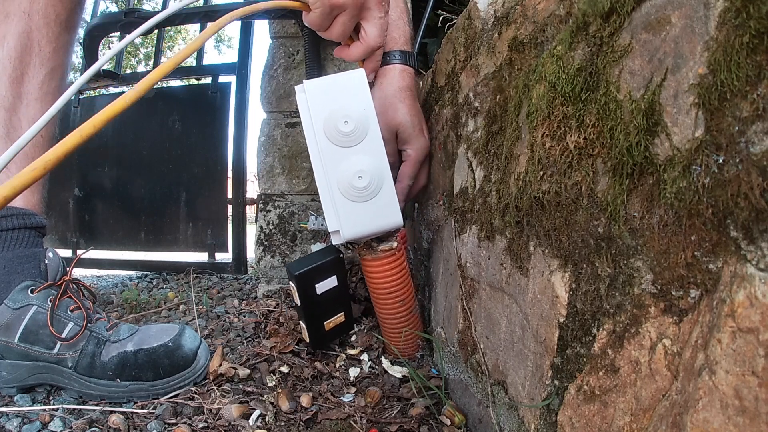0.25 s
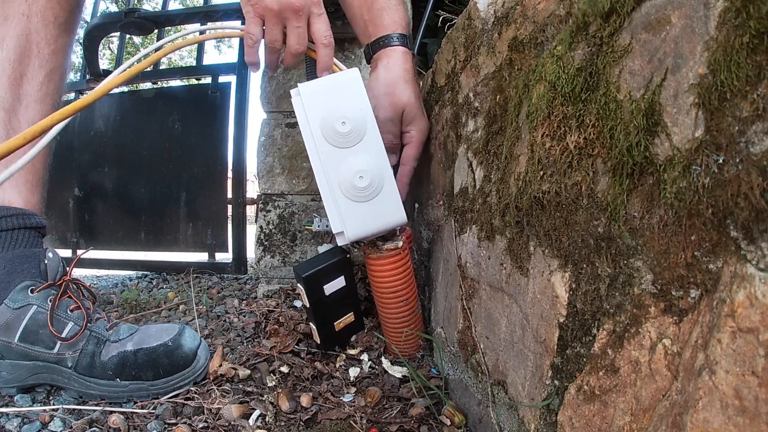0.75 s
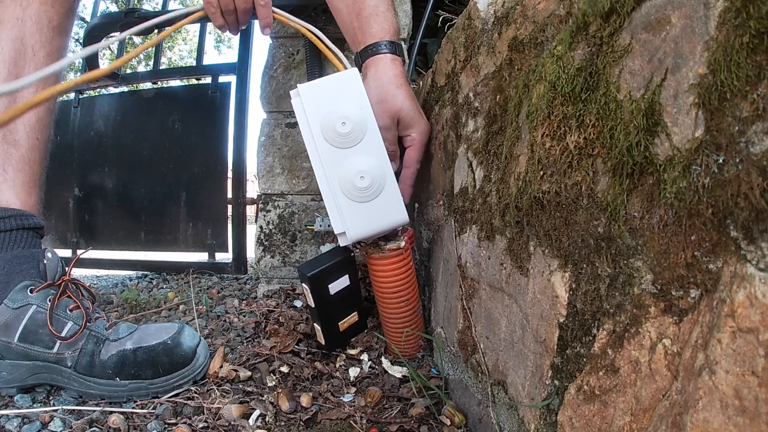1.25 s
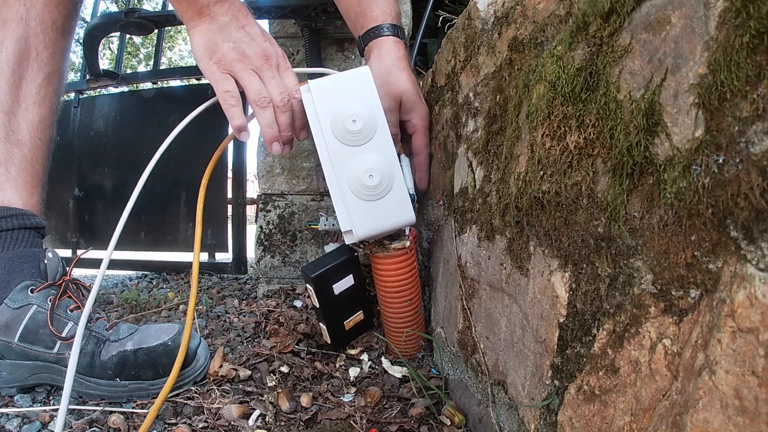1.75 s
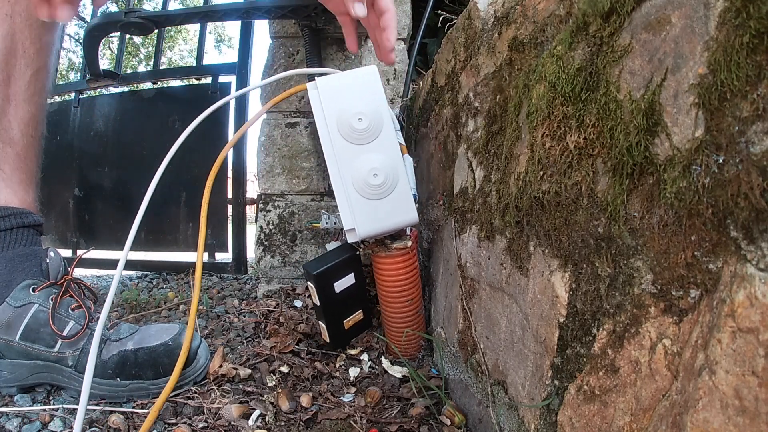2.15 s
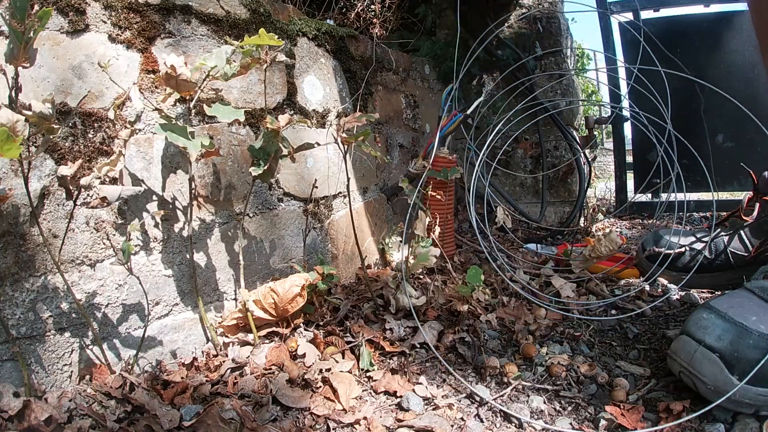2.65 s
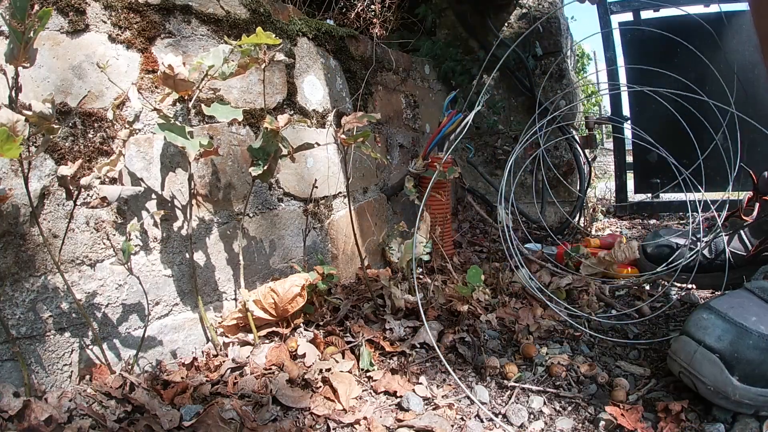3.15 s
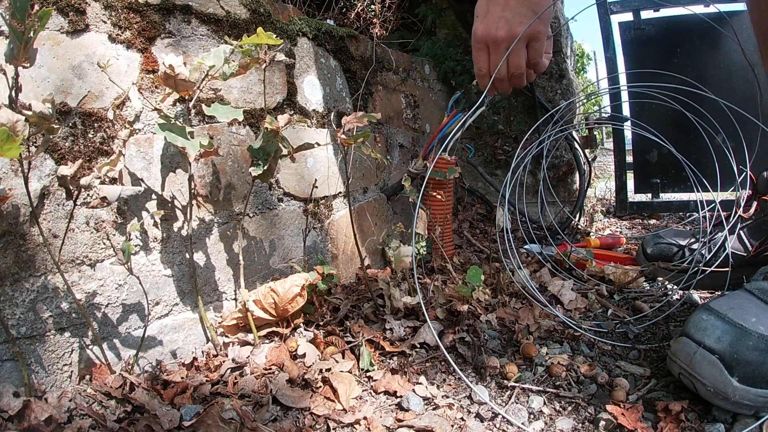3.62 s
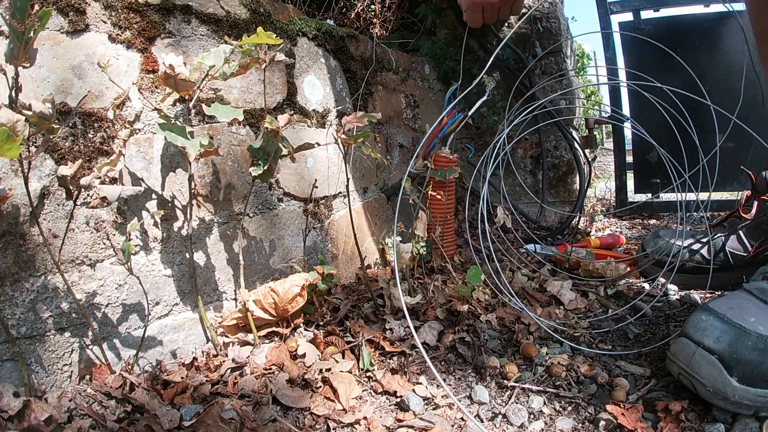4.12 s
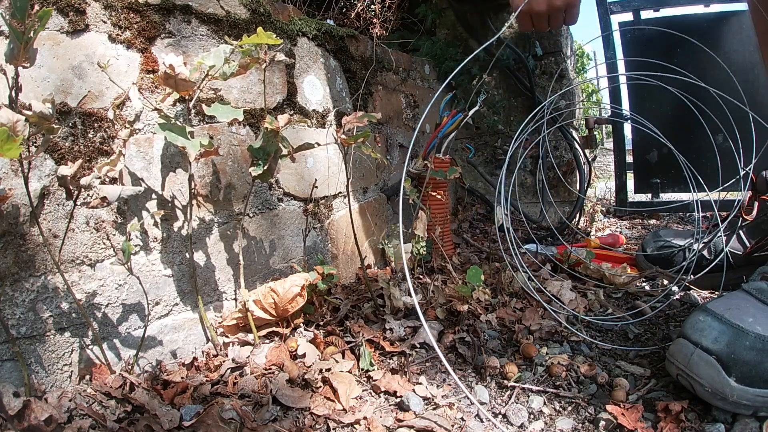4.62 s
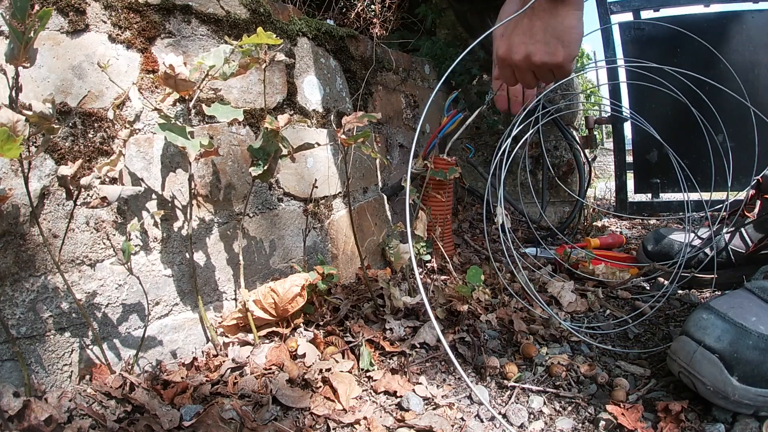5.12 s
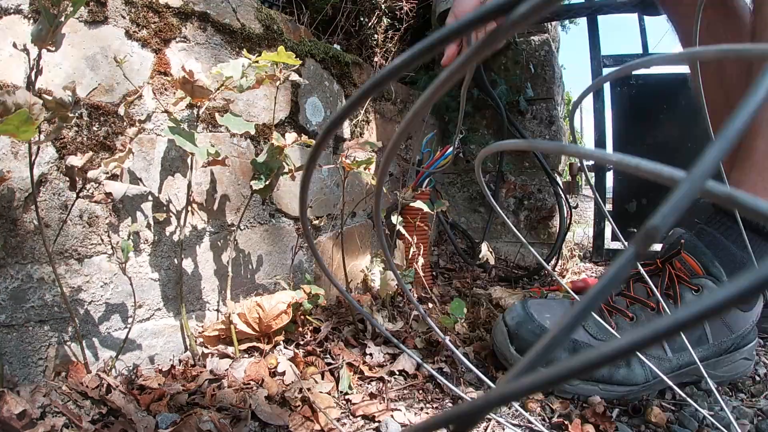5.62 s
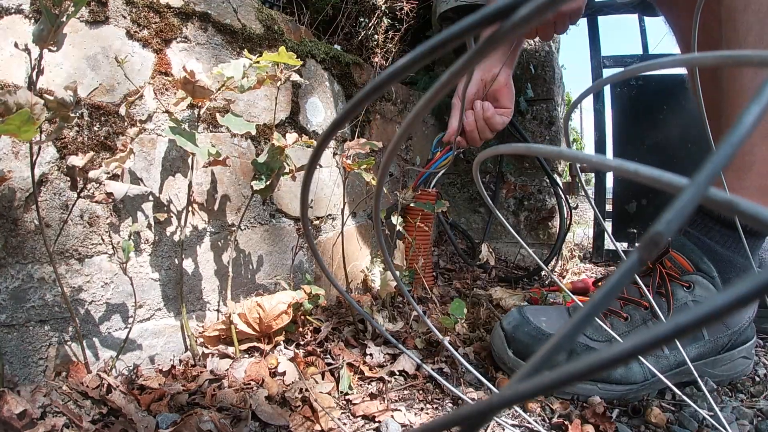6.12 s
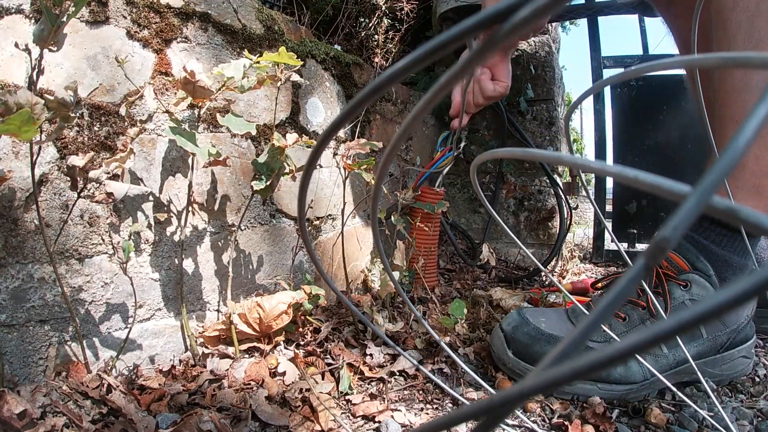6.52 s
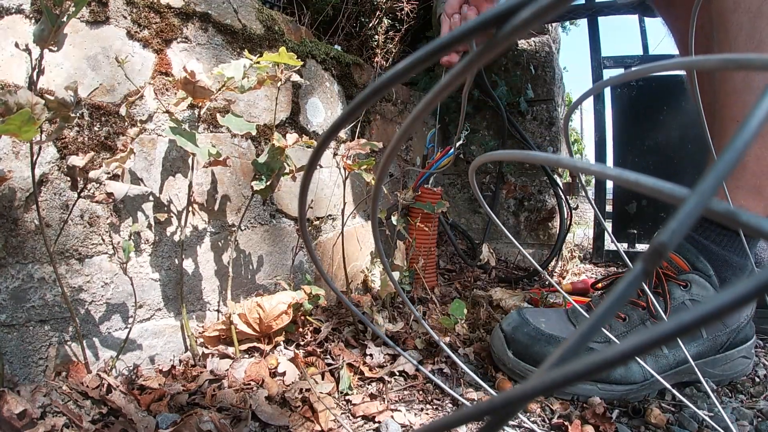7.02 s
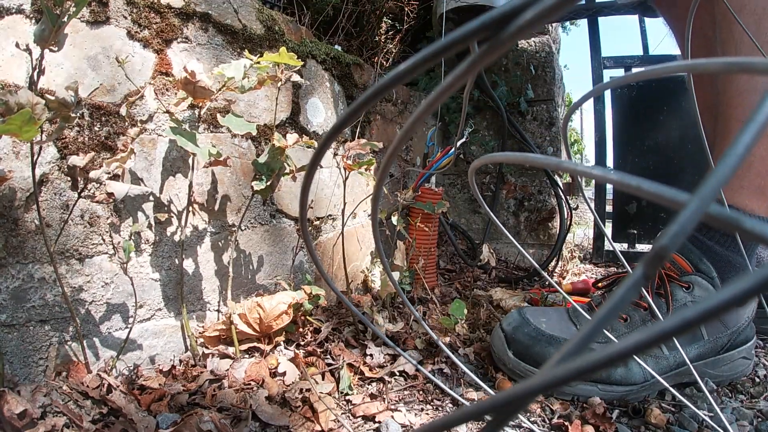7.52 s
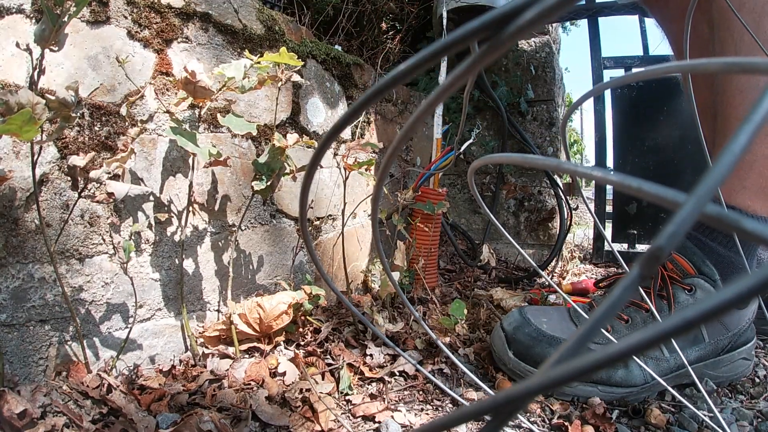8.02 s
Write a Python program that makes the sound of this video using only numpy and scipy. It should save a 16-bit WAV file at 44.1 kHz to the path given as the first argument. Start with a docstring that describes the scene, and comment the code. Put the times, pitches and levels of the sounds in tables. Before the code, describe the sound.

Close outdoor handling of cables and plastic conduit. Quiet rubbing and small dull knocks come first, building to a cluster of hollow thumps. Then thin wire is drawn in long bright hissing strokes with dry ticks and tiny squeaks. Finally stiff coils clack, scrape and drum right by the microphone, fading into low hollow rubbing over faint open air.

```python
"""One hears knocks and hollow rubbing, then long hissing strokes, then clacks, scrapes and drumming.
Cables are worked through corrugated plastic conduit at the foot of a stone wall: slid by hand over a junction
box, then a thin wire drawn out, then coils of cable dragged close by the microphone.
Rubbing is trains of tiny random slips over hiss; contacts are short trains of blows through a coloured filter;
knocks are sagging sines. Outdoor air, a deep rumble, a faint hum and sparse echoes lie behind."""
import sys
import numpy as np
from scipy import signal
from scipy.fft import rfft, irfft
from scipy.io import wavfile
from scipy.ndimage import uniform_filter1d

SR = 44100
rng = np.random.default_rng(int(sys.argv[2]) if len(sys.argv) > 2 else 0)


def unload_audio(sound):
    """Save the sound as a 16-bit wav file, at the path given as the first command line argument."""
    columns = np.transpose(np.atleast_2d(sound))
    # keep every value between -1 and 1, then stretch to whole-number steps
    steps = np.round(np.clip(columns, -1, 1) * 32767)
    wavfile.write(sys.argv[1], SR, steps.astype(np.int16))


N = 364266
T = np.arange(N) / SR
HZ = np.fft.rfftfreq(4096, 1 / SR)

# Levels in the tables are relative: a source may trim them further where it is mixed.
# pulls of cable over the box, draws of the wire, drags of the coils:
# (time at full speed [s], scrape level [dB], hollow rub level [dB], rise [s], fall [s])
BOX_PULLS = [(0.02, -54, -38, 0.018, 0.09), (0.41, -56, -44, 0.049, 0.032),
             (0.61, -47.5, -41, 0.067, 0.072), (0.8, -56, -45, 0.086, 0.14), (1.25, -43.5, -47.5, .2, 0.15),
             (1.55, -46, -52.5, 0.093, 0.09), (1.77, -50.5, -57, 0.2, .04), (2.0, -69, -45, 0.13, 0.18),
             (2.21, -32.5, -30, .1, 0.12), (2.33, -37, -30, .03, 0.018), (2.46, -43, -42, 0.023, .02)]
WIRE_DRAWS = [(2.53, -30, -36, 0.076, 0.31), (2.9, -36, -34, .04, 0.064), (3.05, -39.5, -66, 0.11, 0.11),
              (3.218, -28, -37, 0.1, .17), (3.6, -39, -49, 0.087, 0.15), (4.0, -42, -39, 0.078, 0.052),
              (4.18, -37, -40, 0.2, 0.18), (4.47, -43.5, -69, 0.18, 0.11),
              (4.67, -34.5, -42.5, 0.086, 0.11), (4.939, -36, -48, 0.12, 0.19),
              (5.58, -52, -46.5, 0.065, .15)]
COIL_DRAGS = [(5.87, -41.5, -39, .04, 0.071), (6.11, -33.5, -34, 0.13, 0.031),
              (6.39, -36, -38.5, 0.18, 0.079), (6.58, -31.5, -29.5, 0.051, 0.055),
              (6.92, -38.5, -37, 0.11, 0.23), (7.05, -42, -26.5, 0.064, 0.075),
              (7.32, -36.5, -20, 0.07, 0.078), (7.46, -28.5, -24, 0.15, 0.19), (7.75, -44, -27, 0.17, 0.14),
              (8.19, -63, -30, 0.066, 0.043)]
# colours of the scrape and of the hollow rub in each stage: (frequency [Hz], level per Hz [dB])
BOX_SCRAPE_COLOUR = [(650, -43), (1100, -0.5), (1470, -6.5), (1660, -24), (2550, 2), (3010, -1.5),
                     (3520, 1), (4340, -6.5), (6250, 3), (6990, -3.5), (8620, -3.5), (11500, -22.5),
                     (13000, -22), (15500, -33)]
BOX_RUB_COLOUR = [(30, -37), (70, -1.5), (110, -2.5), (170, 6.5), (320, 3), (450, -4), (680, 0.5),
                  (1050, -12), (1400, -12), (1900, -17.5), (3000, -74)]
WIRE_SCRAPE_COLOUR = [(530, -20.5), (900, -11), (1170, -12), (1750, -2), (2660, -7.5), (3260, -1),
                      (4390, -4), (5980, 1), (6900, -4.5), (7680, -8.5), (8340, -11.5), (9400, -6),
                      (11400, -21.5), (13100, -19), (15500, -38)]
WIRE_RUB_COLOUR = [(29, -36), (50, -14), (76, -6), (108, -12), (194, 5), (274, -6), (420, -5), (499, -9),
                   (562, -5.5), (1200, -20.5), (1560, -13), (2640, -120)]
COIL_SCRAPE_COLOUR = [(500, -27.5), (780, -0.5), (950, -18), (1160, -1.5), (1350, -8.5), (1600, 3.5),
                      (2050, -6), (2800, -2.5), (3760, -9.5), (4600, -4), (7000, -31.5), (10000, -39.5),
                      (12400, -30), (15500, -52)]
COIL_RUB_COLOUR = [(25, -39), (45, -20), (80, -4.5), (110, -13), (160, -0.5), (230, 1), (350, -8),
                   (450, -7), (650, -15), (790, -15.5), (950, -29), (1400, -26), (2200, -62)]
# resonances of box, wire and coils: (frequency [Hz], width at half amplitude [Hz], level [dB])
BOX_RESONANCES = [(2600, 170, -27.5), (5800, 200, -7), (6430, 87, 13.5), (9100, 75, -2)]
WIRE_RESONANCES = [(1680, 110, -14), (3520, 610, -1), (6140, 190, 4), (7750, 330, 5.5), (8500, 230, -12)]
COIL_RESONANCES = [(1152, 78, -2.5), (1600, 55, 6.5), (2247, 66, 7), (2750, 81, 5.5), (3070, 67, -16),
                   (3450, 32, 4), (4000, 43, -16), (4294, 69, 5), (4510, 110, 2.5), (5660, 160, -6.5),
                   (6410, 110, -13), (7840, 47, -38), (8590, 31, -18)]
# colours of the sharp contacts: (frequency [Hz], level per Hz [dB])
TICK_COLOUR = [(350, -14), (600, -5.5), (1020, -7.5), (1810, -6.5), (3820, 2), (4490, -7.5), (6150, 1.5),
               (8400, -3.5), (9120, -8), (11300, -22), (13000, -25), (15500, -33)]
CLACK_COLOUR = [(290, -46), (500, -12), (954, -12.5), (1120, -20), (1560, 6), (2070, -4), (2260, 0),
                (2720, 3.5), (3790, -10.5), (4380, 3), (7030, -24), (8000, -20.5), (9790, -32.5),
                (12100, -23), (15500, -50)]
# clacks of the coiled wire: (time [s], level [dB], rise [s], brightness [dB per octave])
CLACK_EVENTS = [(5.655, -9, 0.0065, -2.5), (5.735, -25.5, .002, -3.5), (5.937, -23.5, .0012, -8),
                (5.946, -18, .003, -2), (6.0637, -3.5, 0.004, 0.5), (6.088, -17.5, .0025, -2.5),
                (6.171, -22, 0.0026, 2), (6.238, -23, 0.0071, -2), (6.268, -6, 0.0029, -0.5),
                (6.337, -12, .003, -0.5), (6.402, -26.5, .001, 1), (6.619, -29.5, 0.00065, 8),
                (6.763, -16, 0.0079, 2.5), (6.785, -17, 0.011, 0.5), (6.853, -21.5, 0.0066, 0),
                (7.113, -25, 0.0062, -4), (7.387, -14.5, 0.014, -0.5), (7.445, -18, 0.0025, 4),
                (7.467, -19, .002, 2), (7.585, -9, 0.0069, 3.5), (7.778, -25.5, 0.0013, 4)]
# dull knocks on box and conduit: (time [s], peak level [dB], nominal pitch [Hz])
KNOCK_EVENTS = [(.007, -19, 784), (.333, -39, 780), (.376, -32, 650), (.425, -28, 490), (.617, -25, 570),
                (.789, -36.5, 805), (.805, -26.5, 670), (0.827, -43, 690), (1.451, -40.5, 600),
                (1.654, -45, 302), (2.051, -37, 482), (2.09, -25.5, 308), (2.106, -26.5, 327),
                (2.15, -15, 560), (2.232, -11, 343), (2.303, -23, 470), (2.327, -12, 477),
                (2.3595, -7.5, 425), (2.411, -17, 800), (2.418, -15, 470), (2.472, -24, 290),
                (2.586, -17.5, 600), (2.602, -23.5, 514), (3.888, -43.5, 230), (4.191, -29.5, 193),
                (4.704, -34, 396), (4.323, -32.5, 880), (5.335, -40.5, 656), (5.766, -27.5, 205.7),
                (6.542, -31, 540), (6.585, -6, 400), (6.848, -19, 242), (7.405, -18.5, 270),
                (7.465, -21, 338), (7.735, -22, 176), (8.18, -26, 390)]
# ticks of wire on plastic: (time [s], level [dB], brightness [dB per octave])
TICK_EVENTS = [(1.166, -25, 9), (1.2381, -22.5, 3), (1.418, -28, 3), (1.7609, -23, -5.5), (1.7754, -27, -2),
               (1.8956, -32.5, -4.5), (2.093, -19.5, -3.5), (2.149, -13.5, -2.5), (2.273, -22.5, 6),
               (2.359, -21.5, 6), (2.377, -27, 4), (2.411, -35, -16), (2.418, -13.5, -10),
               (2.5104, -11, 11), (2.532, -9.5, 6), (2.6918, -11, 2.5), (2.863, -16, -3), (3.052, -15.5, 0),
               (3.244, -21, -4), (3.562, -18.5, 1), (3.728, -24, -1.5), (4.088, -16.5, -4),
               (4.123, -17.5, 1), (4.325, -15.5, 0), (4.7764, -20.5, -0.5), (5.335, -27.5, -1),
               (5.5255, -22, -1)]
# short squeaky slips: (time [s], level [dB], rise [s], pitch [Hz])
SQUEAKY_SLIPS = [(1.536, -9, 0.0082, 4060), (1.7081, -17, 0.0013, 2770), (2.968, -14, 0.0032, 5000),
                 (3.0155, -14, 0.00081, 5150), (3.457, -20, 0.016, 4370), (4.632, -12, 0.028, 5750)]
# smooth cable jacket sliding out of the conduit: (time [s], level [dB])
JACKET_SLIDE = [(7.55, -54), (7.8, -45), (8.05, -50), (8.18, -46), (8.26, -45)]
# its colour: (frequency [Hz], level per Hz [dB])
JACKET_COLOUR = [(1500, -37), (2700, -4), (3700, 6), (4900, 6.5), (6500, -16), (12000, -23.5), (15000, -44)]
# deep rumble of the shifting coils: (time [s], level [dB])
COIL_RUMBLE = [(5.1, -65), (5.7, -45), (6.5, -44), (7.3, -46), (7.47, -39), (8.0, -58), (8.26, -38)]
# echoes between wall and gate: (frequency [Hz], time to fall 60 dB [s])
YARD_DECAY = [(150, 0.28), (1500, 0.09), (5000, 0.084), (12000, 0.13)]
# outdoor air: (frequency [Hz], level per Hz [dB])
AIR_COLOUR = [(25, -24), (60, -2.5), (110, -5.5), (160, 2.5), (300, -11), (520, -27), (750, -15.5),
              (1000, -22), (2000, -18), (6500, -24.5), (9500, -37), (12000, -59), (15000, -74)]
# faint far-off hum: (time [s], level [dB])
HUM_LEVEL = [(3.6, -84), (4.4, -66), (5.0, -60.5), (5.45, -64.5), (5.9, -70), (6.5, -82)]
# microphone pair: (frequency [Hz], left minus right [dB])
PORT_BALANCE = [(8000, 0), (10500, .3), (12500, 2.5), (15000, 1.5)]

WIRE_S, COIL_S = 2.46, 5.648  # start of the second and third stage
# cable creeping between pulls: (scrape level [dB], hollow rub level [dB])
BOX_CREEP, WIRE_CREEP, COIL_CREEP = (-58.5, -57.5), (-52, -56.5), (-52, -42)
PULL_ROUNDNESS = 1.28  # top of a pull: 1 pointed, 2 bell
# the wire skids into and out of each clack: levels against the clack's table level, and times
SKID_SCRAPE_DB, SKID_RUB_DB, SKID_RISE_S, SKID_FALL_S = -25, -22.5, 0.01, 0.063
CLACK_DECAY_S, TICK_DECAY_S, SLIP_DECAY_S = 0.017, 0.005, 0.0034
# a full-scale knock swells within a fraction of a cycle; the swell doubles for every so many dB softer
KNOCK_RISE_CYCLES, KNOCK_SOFTER_DB = 0.326, 19.5
# scuff against its knock: level at full scale, and gain for each dB that the knock is softer
SCUFF_DB, SCUFF_PER_DB = -20, 0.5329
SNAGS_PER_S, SNAG_DB = 4.3, 7  # rate, and level against the untrimmed scrape
AIR_DB = -53
HUM_HZ = 406
EDGE_HZ = 15800  # upper band limit


def box_pulls():
    """Cable dragged by hand over the junction box scrapes it and makes it rub hollowly."""
    scrape = friction(body(BOX_SCRAPE_COLOUR, BOX_RESONANCES, modes_db=-12.5), per_s=1600,
                      spread_db=3.0, smooth=0.7, judder_db=1.9, judder_hz=60, patchy_db=3.5)
    rub = friction(amp(read(BOX_RUB_COLOUR)), per_s=630,
                   spread_db=2.0, smooth=1.0, judder_db=2.0, judder_hz=50, patchy_db=2.5)
    return stroke(BOX_PULLS, BOX_CREEP, 0, WIRE_S, amp(-1) * scrape, amp(2) * rub)


def wire_draws():
    """Thin wire drawn through the conduit: denser slips make the long hissing strokes."""
    scrape = friction(body(WIRE_SCRAPE_COLOUR, WIRE_RESONANCES, modes_db=-7.5), per_s=2200,
                      spread_db=3.0, smooth=1.0, judder_db=2.0, judder_hz=64, patchy_db=2.3)
    rub = friction(amp(read(WIRE_RUB_COLOUR)), per_s=400,
                   spread_db=4.0, smooth=1.0, judder_db=-0.5, judder_hz=30, patchy_db=-1.0)
    return stroke(WIRE_DRAWS, WIRE_CREEP, WIRE_S, COIL_S, amp(1.5) * scrape, amp(-0.5) * rub)


def coil_drags():
    """Coils dragged close by the microphone, with a short skid at each clack."""
    scrape = friction(body(COIL_SCRAPE_COLOUR, COIL_RESONANCES, modes_db=-5.0), per_s=2500,
                      spread_db=-0.5, smooth=0.77, judder_db=2.5, judder_hz=55.0, patchy_db=3.0)
    rub = friction(amp(read(COIL_RUB_COLOUR)), per_s=1200,
                   spread_db=1.5, smooth=1.28, judder_db=2.0, judder_hz=40, patchy_db=1.5)
    rows = COIL_DRAGS + skids()
    return stroke(rows, COIL_CREEP, COIL_S, T[-1] + 1, amp(0.5) * scrape, amp(-2.0) * rub)


def skids():
    """The short drag that goes with each clack, as rows of pulls."""
    return [(s + rise, db + SKID_SCRAPE_DB, db + SKID_RUB_DB, SKID_RISE_S, SKID_FALL_S)
            for s, db, rise, _ in CLACK_EVENTS]


def stroke(rows, creep, start, end, scrape, rub):
    """One stage of pulling: the scrape and the hollow rub follow the hand."""
    scrape_gain, rub_gain = pace(rows, creep)
    inside = 1. * ((T >= start) & (T < end))
    during = uniform_filter1d(inside, size=600)  # stages cross over in 14 ms
    return during * (scrape_gain * scrape + rub_gain * rub)


def pace(rows, creep):
    """Gains of the scrape and of the rub: every pull gathers speed and dies away, over a slow creep."""
    t = T[::64]
    power = amp(creep)[:, None] ** 2
    for s, scrape_db, rub_db, rise, fall in rows:
        side = np.maximum(np.where(t < s, rise, fall), 1 / SR)
        speed = np.exp(-(abs(t - s) / side) ** PULL_ROUNDNESS)
        power = power + (amp([[scrape_db], [rub_db]]) * speed) ** 2
    return [np.interp(T, t, gain) for gain in np.sqrt(power)]


def friction(gain, per_s, spread_db, smooth, judder_db, judder_hz, patchy_db):
    """Tiny slips of unequal size over a smooth hiss; they bunch as the cable catches on the ribs."""
    sizes = amp(spread_db * np.minimum(rng.exponential(1, N), 4)) * rng.choice([-1, 1], N)
    slips = evened(sizes * (rng.random(N) < per_s / SR))
    rough = slips + smooth * rng.standard_normal(N)
    judder = amp(judder_db * np.clip(waver(judder_hz), -2, 2))
    return evened(shifting(colour(rough * judder, gain), patchy_db))


def clacks():
    """The coiled wire strikes with a bright crack and rings on; each blow also sets the conduit drumming."""
    out = np.zeros(N)
    gain = body(CLACK_COLOUR, COIL_RESONANCES, modes_db=3.5)
    drum = 1 / (1 + ((HZ - 215) / 60) ** 2)
    damped = gain / (1 + (HZ / 8500) ** 2)  # the ring has less treble than the crack
    for s, db, rise, bright in CLACK_EVENTS:
        ring = chatter(damped, db, rise, CLACK_DECAY_S, bright)
        crack = chatter(gain, db, .6 * rise, .006, bright + 10)
        drumming = chatter(drum, db, 0.0097, 0.061, 0)
        add(out, s, amp(-6.5) * ring)
        add(out, s, amp(-16) * crack)
        add(out, s, amp(-25.5) * drumming)
    return shifting(out, patchy_db=3.0)


def knocks():
    """A few cycles of the plastic shell, sagging in pitch, and a brief scuff as the cable settles."""
    out = np.zeros(N)
    t = np.arange(4096) / SR
    for s, db, hz in KNOCK_EVENTS:
        rise = KNOCK_RISE_CYCLES / hz * 2 ** (-db / KNOCK_SOFTER_DB)
        age = t / max(rise, 1e-4)
        # the pitch sags from 1.8 to 0.565 of nominal
        turns = np.cumsum(hz * (0.565 + 1.24 * np.exp(-age / 2.03))) / SR
        push = np.sin(2 * np.pi * turns) * age ** 2 * np.exp(-age)
        add(out, s, amp(db) * push / abs(push).max())
        shell = HZ / hz / (1 + (HZ / (1.06 * hz)) ** 2.84)
        scuff_db = db + SCUFF_DB - SCUFF_PER_DB * db
        add(out, s, chatter(shell, scuff_db, 0.0008, 0.0071, 0))
    return out


def ticks():
    """Wire flicks against plastic as a short burst of blows."""
    out, gain = np.zeros(N), amp(read(TICK_COLOUR))
    for s, db, bright in TICK_EVENTS:
        add(out, s, amp(-10.5) * chatter(gain, db, 0.0015, TICK_DECAY_S, bright))
    return out


def squeaks():
    """Wire slips on plastic: a tick's colour with a broad peak at the squeak's pitch."""
    out, gain = np.zeros(N), amp(read(TICK_COLOUR))
    for s, db, rise, hz in SQUEAKY_SLIPS:
        peak = 1 + 2.5 / (1 + ((HZ / hz - 1) / .15) ** 2)
        add(out, s, amp(-9) * chatter(gain * peak, db, rise, SLIP_DECAY_S, 0.22))
    return out


def snags():
    """Faint ticks at random through the first two stages, as loud as the pull is hard."""
    t = np.arange(2048) / SR
    hits = rng.random(N) * (rng.random(N) < SNAGS_PER_S / SR) * (T < COIL_S)
    bursts = signal.oaconvolve(hits, np.exp(-t / TICK_DECAY_S))[:N]
    scrape_gain = pace(BOX_PULLS + WIRE_DRAWS, BOX_CREEP)[0]
    hiss = evened(colour(rng.standard_normal(N), amp(read(TICK_COLOUR))))
    return amp(SNAG_DB) * scrape_gain * bursts * hiss


def chatter(gain, db, rise, decay, bright):
    """A contact is a quick train of tiny blows that swells and dies, ringing the body that it meets."""
    t = np.arange(8192) / SR
    rise, decay = max(rise, 1e-4), max(decay, 1e-4)
    shape = np.minimum(t / rise, 1) ** 2 * np.exp(-np.maximum(t - rise, 0) / decay)
    blows = rng.choice([-1, 1], len(t)) * (rng.random(len(t)) < .3)
    tilt = amp(bright * np.log2(np.maximum(HZ, 500) / 3000))
    sound = colour(blows * shape, gain * tilt)
    # match the energy of the bare shape
    return amp(db) * sound * np.sqrt(np.sum(shape ** 2) / (np.sum(sound ** 2) + 1e-20))


def jacket_slide():
    """Soft hiss of the last cable: its smooth jacket gives friction with fine slips."""
    hiss = friction(amp(read(JACKET_COLOUR)), per_s=2500,
                    spread_db=3, smooth=1.5, judder_db=.8, judder_hz=50, patchy_db=1)
    return hiss * swell(JACKET_SLIDE)


def coil_rumble():
    """Shifting coils rumble: noise in a narrow band around 31 Hz."""
    deep = colour(rng.standard_normal(N), 1 / (1 + ((HZ - 31) / 12) ** 2))
    return evened(deep) * swell(COIL_RUMBLE)


def yard(x):
    """Sparse echoes off the stones, each band dying at its own rate."""
    taps = rng.choice([-1., 1.], SR // 2) * (rng.random(SR // 2) < 2500 / SR)
    taps[:round(.005 * SR)] = 0  # no echo in the first 5 ms
    hz, t, z = signal.stft(taps, SR, nperseg=256)
    fading = amp(-60 * t / read(YARD_DECAY, hz)[:, None])
    tail = signal.istft(z * fading, SR, nperseg=256)[1]
    return signal.oaconvolve(x, tail / np.linalg.norm(tail))[:N]


def outdoor_air():
    """Steady coloured noise of the open air."""
    return amp(AIR_DB) * evened(colour(rng.standard_normal(N), amp(read(AIR_COLOUR))))


def hum():
    """A thin tone from far away, its pitch wavering at random."""
    turns = np.cumsum(HUM_HZ * (1 + 0.0118 * waver(21.0))) / SR
    return swell(HUM_LEVEL) * evened(np.sin(2 * np.pi * turns))


def shifting(x, patchy_db):
    """The point of contact wanders, so that different resonances come and go."""
    z = signal.stft(x, nperseg=512)[2]
    patches = uniform_filter1d(rng.standard_normal(z.shape), size=6, axis=0)
    patches = uniform_filter1d(patches, size=6, axis=1)
    return signal.istft(z * amp(patchy_db * evened(patches)), nperseg=512)[1][:N]


def body(spectrum, modes, modes_db):
    """Gain of a broad colour with resonances standing out of it."""
    power = sum(amp(db + modes_db) ** 2 / (1 + (2 * (HZ - hz) / width) ** 2) ** 2
                for hz, width, db in modes)
    return np.sqrt(amp(read(spectrum)) ** 2 + power)


def colour(x, gain):
    """Causal minimum-phase filter with the shape of the given gain at each of HZ, its peak at 1."""
    log_gain = np.log(np.maximum(gain / gain.max(), 1e-5))
    circle = np.concatenate([log_gain, log_gain[-2:0:-1]])
    taps = np.fft.ifft(np.exp(np.conj(signal.hilbert(circle)))).real
    return signal.oaconvolve(x, taps)[:len(x)]


def waver(rate_hz):
    """Slow random drift of rms 1."""
    f = np.fft.rfftfreq(N, 1 / SR)
    return evened(irfft(rfft(rng.standard_normal(N)) / (1 + (f / rate_hz) ** 2), N))


def swell(rows):
    """Gain along a level curve, silent before its first point."""
    s, db = np.transpose(rows)
    return amp(np.interp(T, s, db)) * (T >= s[0])


def read(points, hz=HZ):
    """Table values at the given frequencies, straight lines on a log axis."""
    f, value = np.transpose(points)
    return np.interp(np.log(hz + 1), np.log(f + 1), value)


def amp(db):
    """Decibels to gain."""
    return 10 ** (np.asarray(db) / 20)


def evened(x):
    """Scales to rms 1."""
    return x / np.sqrt(np.mean(x ** 2) + 1e-20)


def add(mix, s, sound):
    """Adds a sound at time s."""
    part = mix[max(round(s * SR), 0):][:len(sound)]
    part += sound[:len(part)]


def scene():
    """All sources close in front, the same in both channels, with a little echo on the contacts."""
    pulling = box_pulls() + wire_draws() + coil_drags()
    clack, knock = clacks(), knocks()
    tick = ticks() + squeaks() + snags()
    echo = yard(amp(-10.0) * tick + amp(-16.5) * clack + amp(-16.5) * knock)
    background = jacket_slide() + coil_rumble() + outdoor_air() + hum()
    mix = pulling + clack + knock + tick + echo + background
    return np.array([mix, mix])


def record(dry):
    """The left port is a little brighter, the loudest peaks are rounded off, then the band limit."""
    balance_db = read(PORT_BALANCE, np.fft.rfftfreq(N, 1 / SR))
    pair = irfft(rfft(dry) * amp(np.array([balance_db, -balance_db]) / 2), N)
    pair = pair / (1 + (pair / .62) ** 6) ** (1 / 6)  # peaks stay under 0.62
    low_pass = signal.firwin(511, EDGE_HZ, window=("kaiser", 9), fs=SR)
    return signal.oaconvolve(pair, low_pass[None], "same")


dry = scene()
out = record(dry)
unload_audio(out)
```